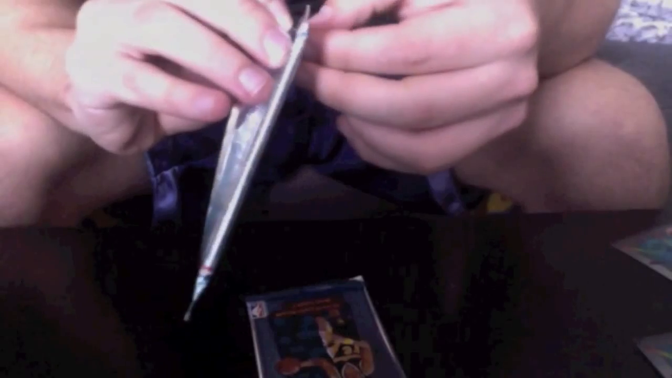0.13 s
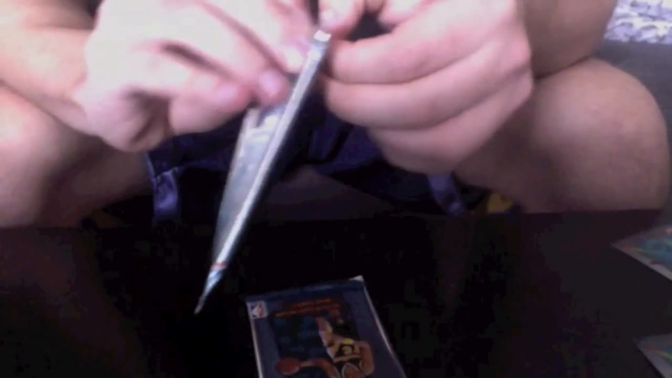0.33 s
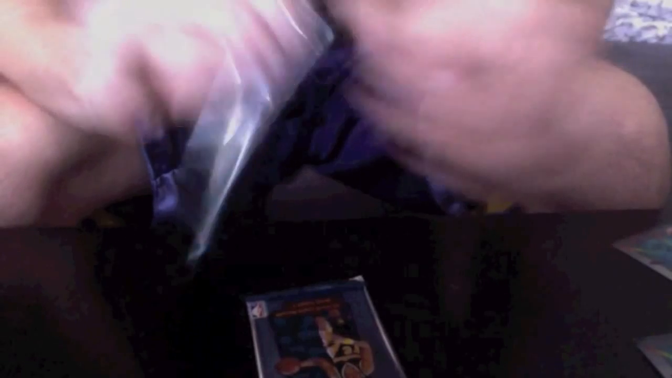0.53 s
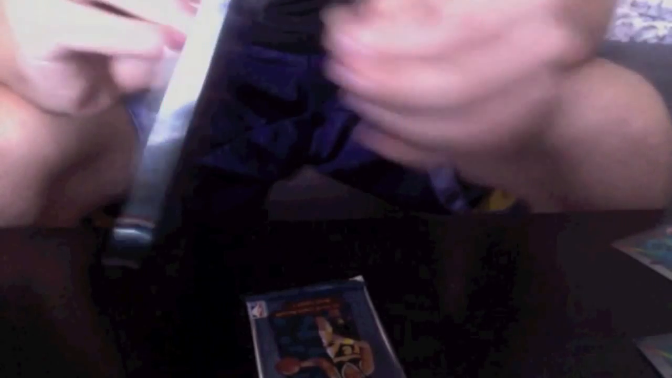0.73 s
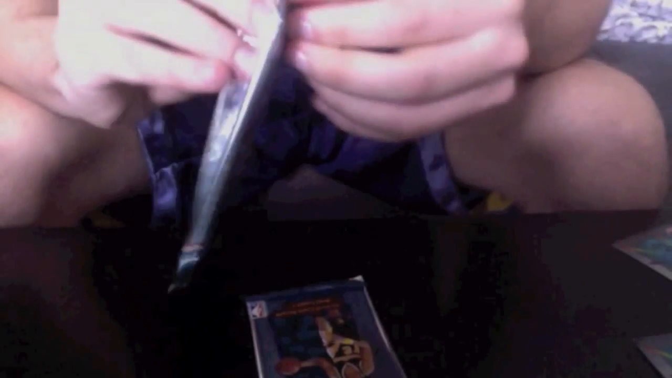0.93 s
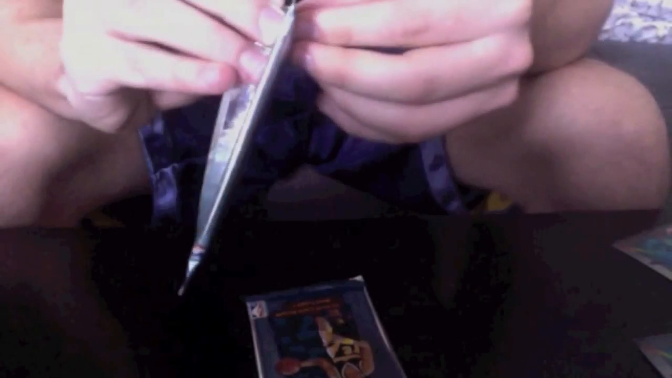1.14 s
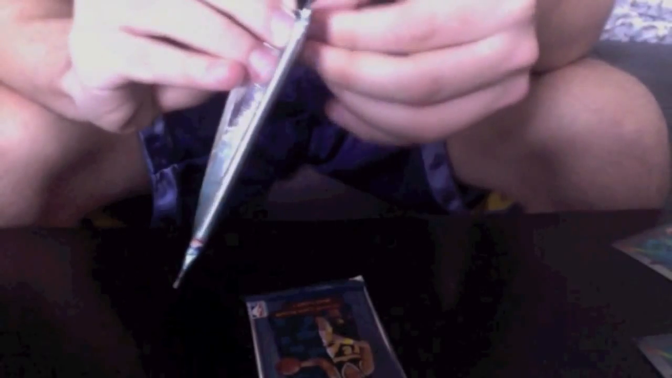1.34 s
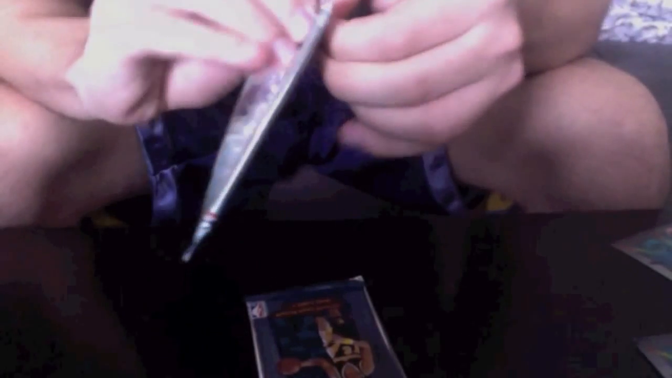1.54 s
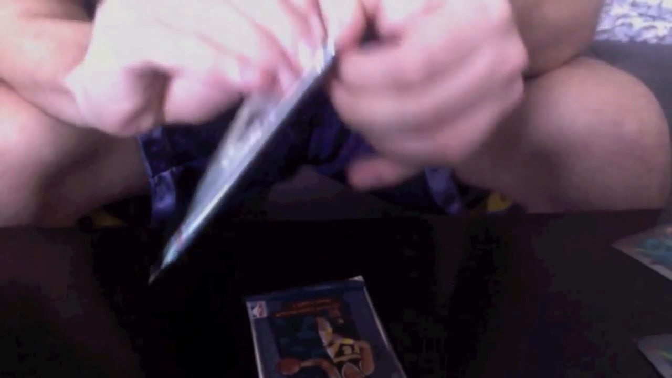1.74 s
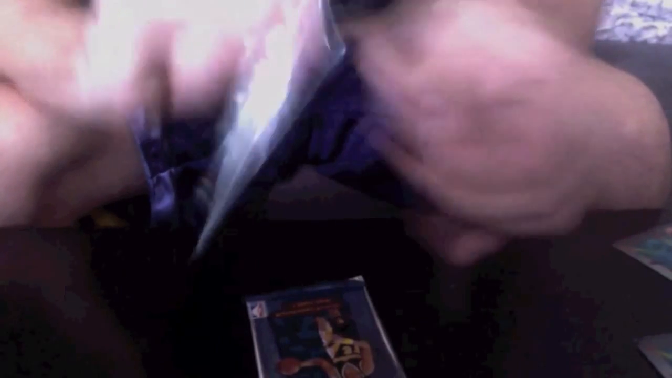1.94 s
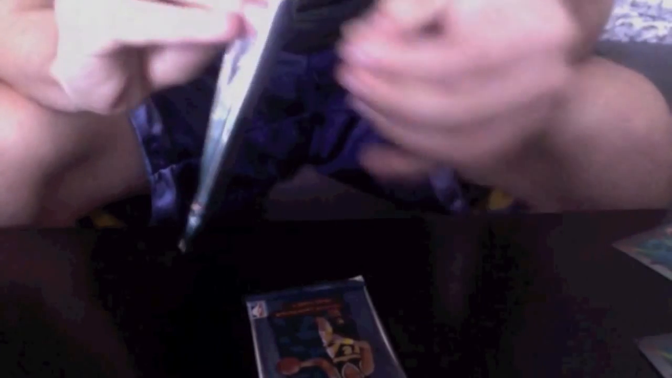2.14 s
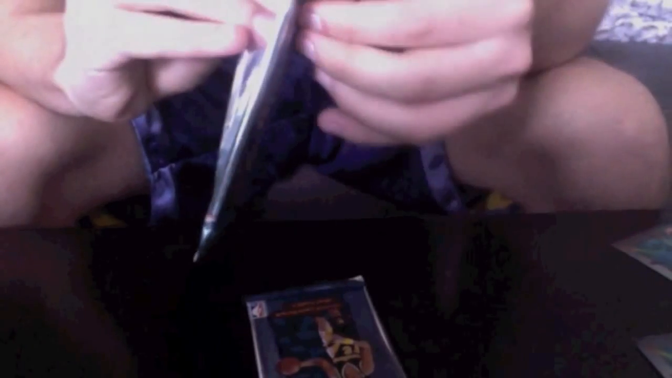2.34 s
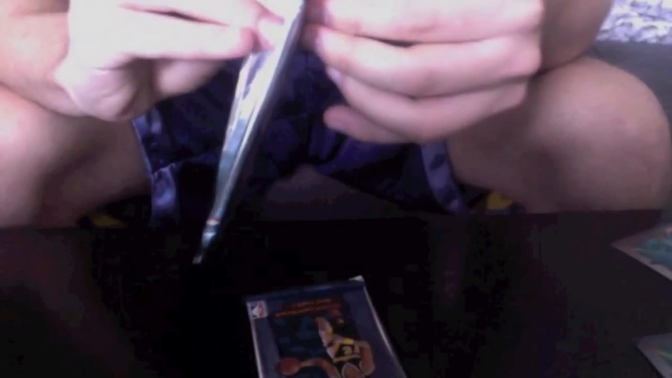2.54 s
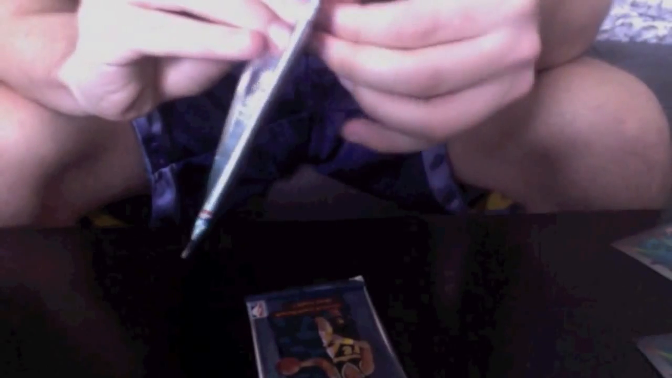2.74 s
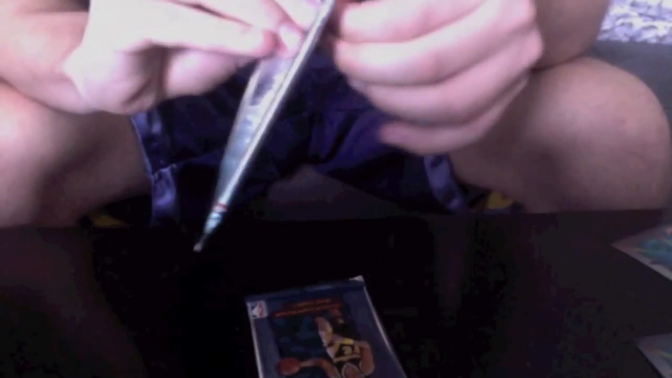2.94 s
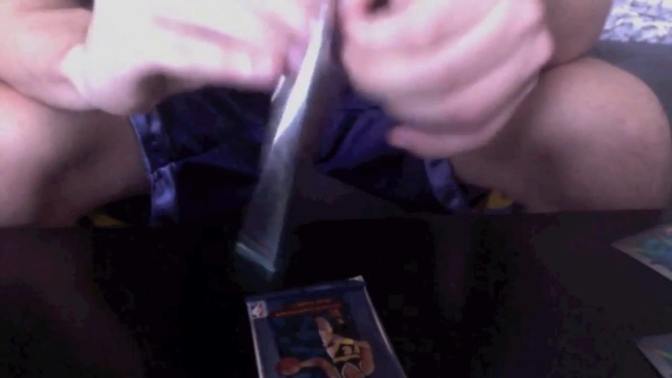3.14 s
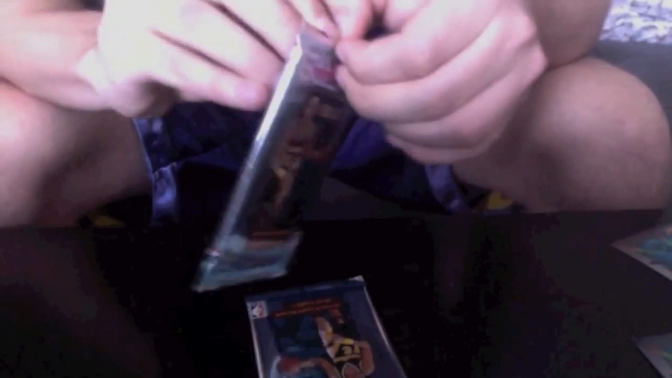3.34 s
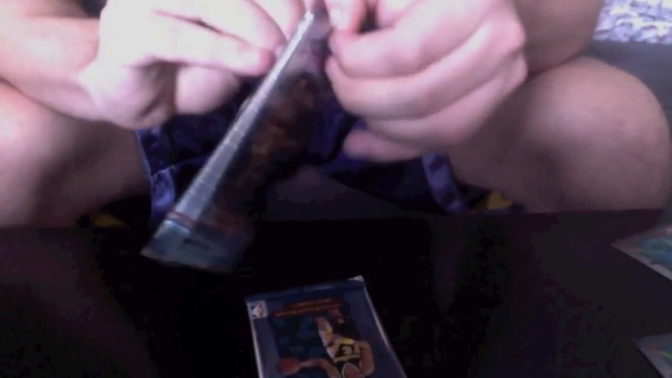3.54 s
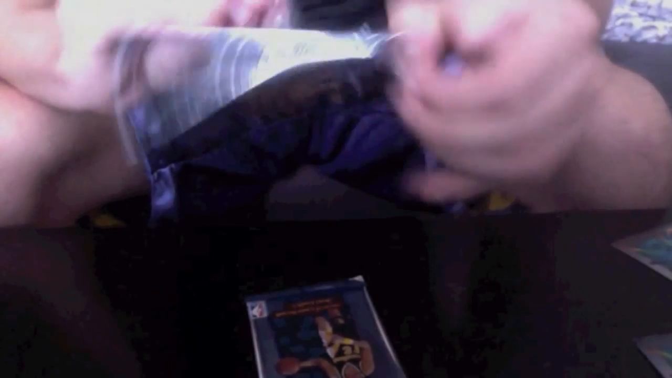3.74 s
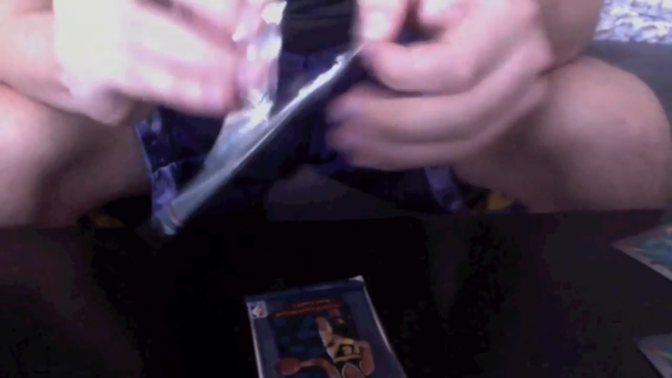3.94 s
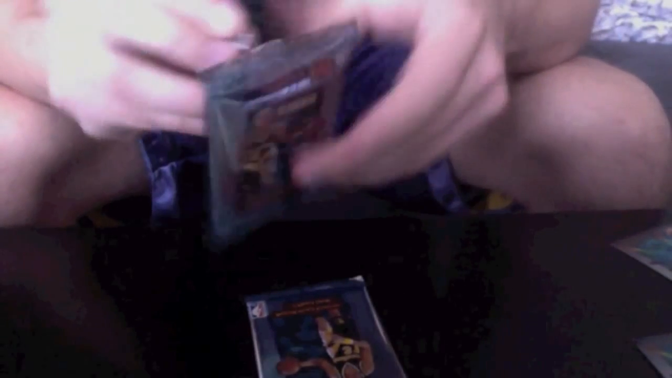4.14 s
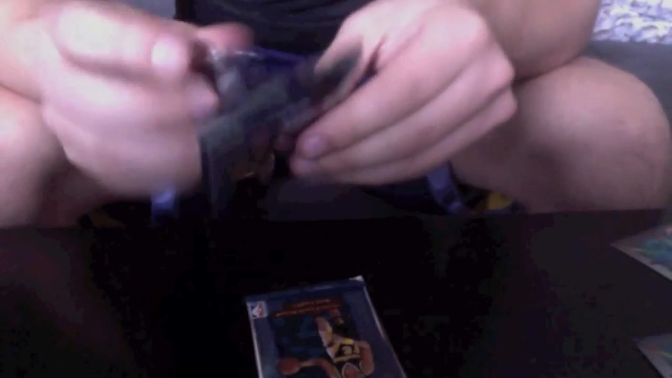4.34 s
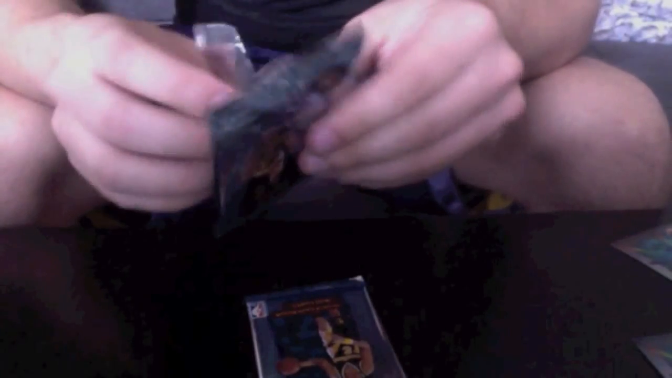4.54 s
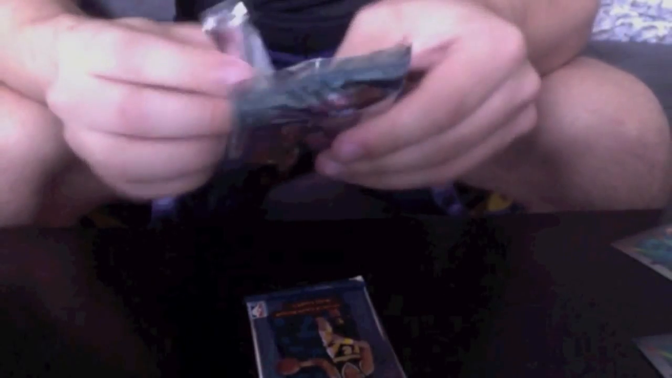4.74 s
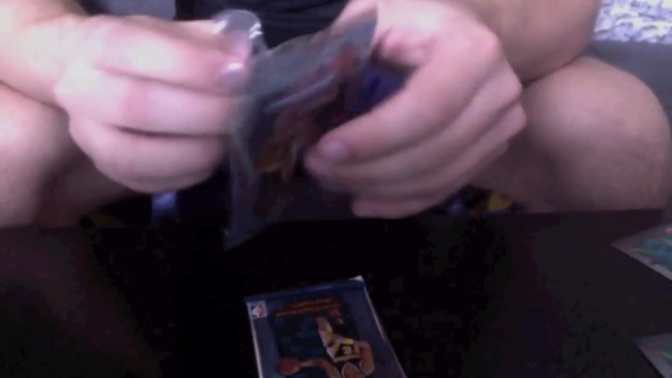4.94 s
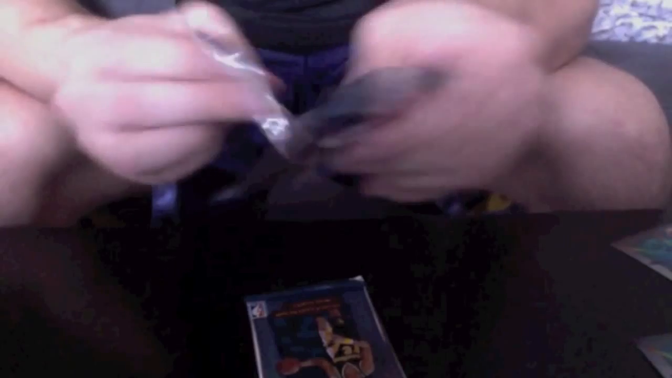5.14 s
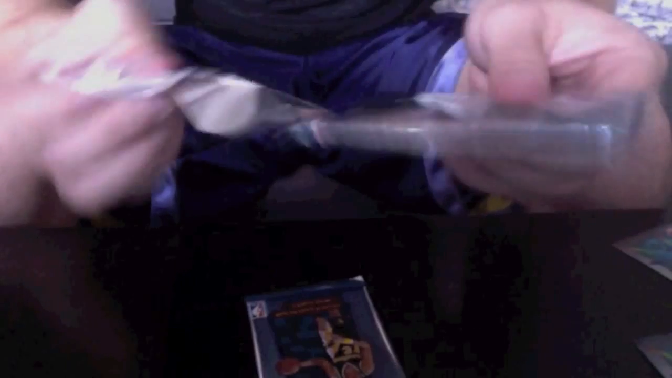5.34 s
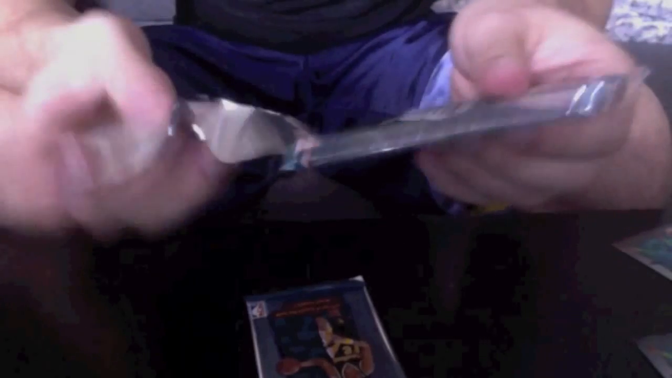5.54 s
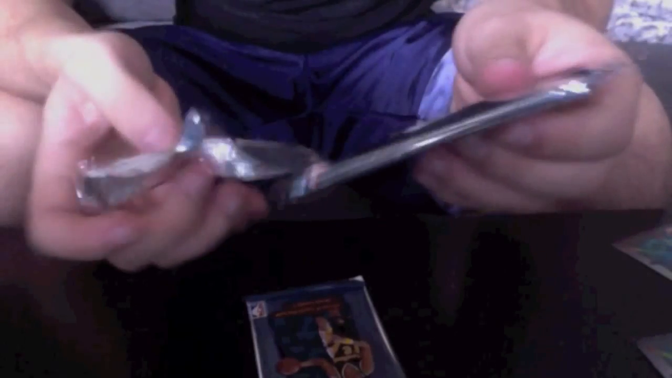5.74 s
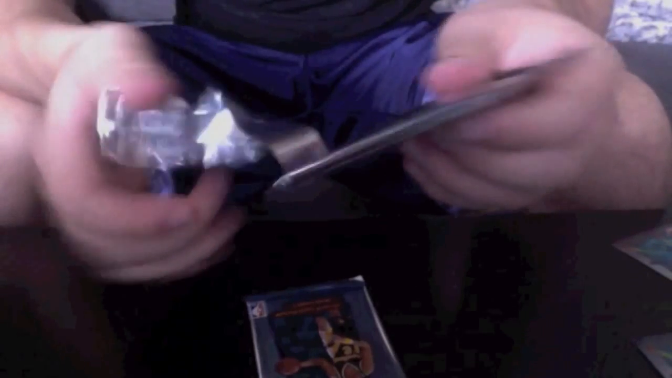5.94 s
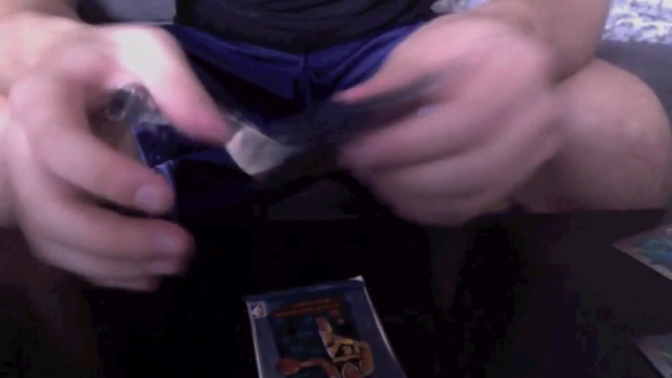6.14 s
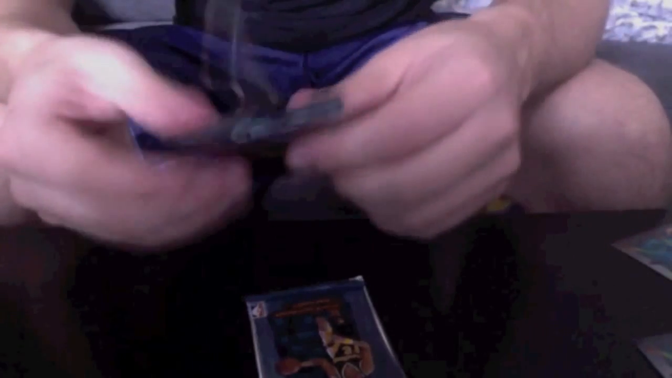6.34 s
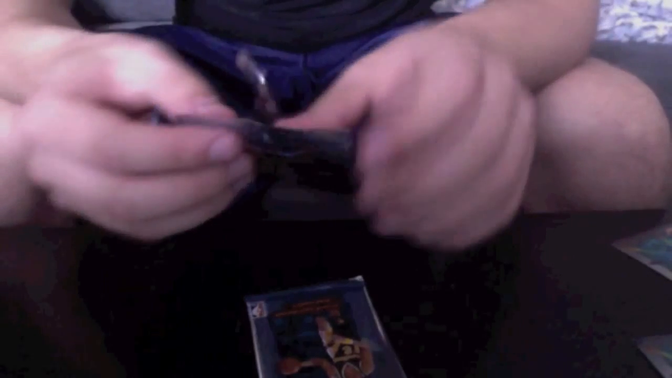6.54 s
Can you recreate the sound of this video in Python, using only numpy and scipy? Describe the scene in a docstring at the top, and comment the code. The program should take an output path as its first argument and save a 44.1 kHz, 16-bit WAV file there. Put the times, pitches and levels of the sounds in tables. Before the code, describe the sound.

Close, bright crackling of a stiff foil pack being picked at, ripped open in one harsh burst, then crumpled and pulled apart in a quiet room.

```python
"""Foil pack picked at, torn and crumpled by hand close to a microphone in a quiet room.
Each buckling crease is a burst of noise ringing its panel for a few cycles; tears pack them densely.
A glued seam creaks in even slips; cards in the pack knock as short decaying low sines.
The table top answers at once, the room a little later; under it lie a hush and a soft fan hum.
The loudest tears are softly clipped."""
import sys
import numpy as np
from scipy import signal
from scipy.fft import rfft, irfft, next_fast_len
from scipy.io import wavfile
from scipy.ndimage import map_coordinates

SR = 44100
rng = np.random.default_rng(int(sys.argv[2]) if len(sys.argv) > 2 else 0)


def to_wav(s):
    """Save 16-bit WAV."""
    ch = np.atleast_2d(s).T  # columns
    pcm = np.round(np.clip(ch, -1, 1) * 32767)  # PCM
    wavfile.write(sys.argv[1], SR, pcm.astype(np.int16))


N = 295470

# single creases buckling: (t/s, panel peak level/dB, panel pitch f/Hz,
#   thud level re panel/dB, sheen level re panel/dB)
CREASES = [(0.0886, -13, 6500, -57.5, -12), (.1987, -18, 4510, -40.5, -17.5),
           (0.204, -14, 4580, -29, -25.5), (0.2211, -2, 4900, -44.5, -8), (.2757, -24.5, 6310, -34.5, -7),
           (.293, -19.5, 4290, -13.5, -29), (0.305, -21, 3260, -29, -21), (.4107, -38, 3780, -19.5, -18),
           (0.4427, -14, 4750, -24.5, -21), (0.4565, -8, 6100, -27.5, -11), (0.4594, -1.5, 6350, -16, -22),
           (.464, 5.5, 5390, -14, -10.5), (0.4764, -13.5, 3640, -3.5, -14.5),
           (0.4843, -10, 7240, -11.5, -13), (.5568, -13, 5370, -26.5, -10), (.5785, -29, 7020, -25, -14),
           (0.5887, -1, 6200, -23, -19.5), (0.6205, 0, 4790, -40, -18.5), (0.6279, -27, 4870, 4.5, -22),
           (0.811, -8, 5100, -21.5, -17.5), (.826, -34, 4000, -22, -20), (0.8625, -17, 4290, -22, -41),
           (.911, -3, 4720, -31.5, -17), (0.952, -25.5, 4540, -26.5, -27), (0.9715, -13.5, 3750, -49, -25),
           (1.014, -12.5, 3740, -18, -25), (1.331, -15, 4900, -38, -47), (1.339, -23.5, 1984, -27, -10),
           (1.3672, -35, 3980, -18, -17), (1.406, -30, 4370, -32.5, -40.5), (1.4531, -18, 4760, -39.5, -11),
           (1.4728, -4, 4900, -24, -12.5), (1.519, -33, 5300, -26.5, -19.5),
           (1.5323, 1.5, 5280, -46, -34.5), (1.5394, -4.5, 6000, -32, -13),
           (1.5495, -19, 5230, -38.5, -17.5), (1.5924, -3.5, 4830, -50, -17),
           (1.5961, -5.5, 5400, -19, -24), (1.6625, -18.5, 4770, -32, -24),
           (1.836, -11.5, 4630, -22.5, -16), (1.8578, 1, 5170, -14, -20.5), (1.873, -1, 6830, -20.5, -19),
           (1.8764, -5.5, 4100, -18.5, -1.5), (1.9593, -14.5, 2070, -17, -30),
           (1.9726, -5, 5700, -18.5, -25), (2.2598, -28.5, 4400, -24, -42.5), (2.2746, -9, 4080, -23, -20),
           (2.417, -33, 3400, -12, -30), (2.5355, -15, 4480, -23, -11.5), (2.5933, -21, 4750, -43, -21),
           (2.633, -24.5, 4700, -26, -14.5), (2.7156, -34, 5800, -12.5, -11.5),
           (2.7834, -27.5, 5300, -22, -22), (2.802, -33, 5450, -21, -6), (2.824, -6.5, 6560, -32, -9),
           (2.8832, -8, 3170, -19.5, -23), (2.9102, -19, 4820, -32, -31), (2.9183, -13.5, 4700, -37, -27),
           (2.9336, -15.5, 4770, -44, -8.5), (3.037, -10, 5530, -20, -11), (3.0526, -3.5, 5400, -32, -9.5),
           (3.0693, -3.5, 4470, -57, -8.5), (3.126, -8.5, 5430, -38.5, -8.5),
           (3.133, -11.5, 4390, -28, -30), (3.1452, -5, 5260, -32.5, -3), (3.154, -24, 2240, -5, -20.5),
           (3.1774, -25.5, 4870, -20.5, -27), (3.2167, -19, 6800, -39.5, -6),
           (3.253, -26.5, 3700, -25.5, -33.5), (3.2748, -1.5, 6500, -14.5, -8),
           (3.3084, -33.5, 5770, -6.5, -28.5), (3.3465, -32, 5730, -19.5, -15),
           (3.3658, 2, 5800, -22.5, -17), (3.4054, -26, 2550, -19, -9.5), (3.4333, -20.5, 1940, -6, -38),
           (3.4786, -25, 3380, -14, -36), (3.4942, -12.5, 4170, -12.5, -25), (3.5105, -30, 5200, -22, -24),
           (3.5362, -25, 4540, -21.5, -32), (3.5605, -32, 4390, -21, -36), (3.5662, 4, 5400, -25, -10),
           (3.6727, -0.5, 4410, -29, -25), (3.6899, 2, 3590, -37.5, -23), (3.6942, 2, 3680, -24, -15),
           (3.701, -5.5, 4550, -6, -23), (3.7098, -9, 2000, -15, -24), (3.7178, -8, 1850, -12, -16),
           (3.727, -7, 3070, -28, -11.5), (3.7431, -7.5, 5550, -19, -26), (3.751, -1.5, 4870, -34.5, -21.5),
           (3.7695, -16, 3930, -4, -26), (3.779, -16, 5200, -5, -18), (3.786, -19.5, 3320, -26, -13),
           (3.806, -12, 3810, -23, -21), (3.813, -14, 3570, -28, -28.5), (3.8291, 3, 4730, -16.5, -17),
           (3.831, -2, 3230, -11.5, -29.5), (3.864, -13.5, 4150, -13, -32), (3.882, -20.5, 4240, -8, -27),
           (3.9558, -11, 6100, -55, -31), (3.9727, -29, 6070, -29.5, -30), (4.025, -9.5, 4980, -16.5, -26),
           (4.1352, -37.5, 2070, -5, -23.5), (4.1967, -26, 4400, -9, -34), (4.25, -19.5, 3900, -16, -13),
           (4.27, -16.5, 3880, -27, -17), (4.289, -23, 3570, -15, -31), (4.3122, -1, 4860, -27.5, -19),
           (4.3277, -5, 4670, -12.5, -28), (4.3348, -6, 5700, -15, -26), (4.3383, -5, 4880, -12, -12),
           (4.3579, -19.5, 4730, -5, -20), (4.4064, -27, 4570, -16, 2), (4.423, -22, 4700, -17, -14),
           (4.4455, -15.5, 4440, -11, -37), (4.5042, -7.5, 4770, -32, -18), (4.5268, -18, 4500, -23, -28),
           (4.5526, -7, 4500, -26, -21), (4.563, -9.5, 5950, -18, -19), (4.5906, -5.5, 5250, -22, -16.5),
           (4.6163, -4.5, 4600, -23, -17), (4.657, -17, 4700, -24, -8), (4.68, -28, 4800, -22, -21),
           (4.6864, -9.5, 4600, -11.5, -15), (4.7063, -16, 4330, -36, -15), (4.719, -4, 5200, -43, -9.5),
           (4.7264, -10.5, 4350, -34, -27), (4.732, -19, 4600, -11, -22), (4.7388, -17, 4630, -13, -23),
           (4.7699, -20.5, 7000, -27, -7), (4.811, -20, 6800, -10, -17), (4.8198, -20, 3620, -24, -28),
           (4.8344, -9, 6030, -13, -22), (4.846, -13, 5150, -31, -18), (4.8554, -9.5, 4400, -22, -15),
           (4.8594, -8, 4610, -17, -18), (4.8747, 1.5, 5310, -31.5, -14.5), (4.88, -8.5, 6200, -11, -7),
           (4.8916, -1, 4120, -22, -18), (4.9097, -18, 3730, -26, -12), (4.9436, -28, 5320, -18, -31),
           (4.9494, -20.5, 4570, -15, -37), (4.972, -4, 3770, -30, -40), (4.9841, -5, 5200, -34.5, -22),
           (4.994, -3, 5200, -36.5, -15), (5.0098, -9.5, 4160, -38, -12), (5.023, -12, 4540, -13, -15),
           (5.0544, -2, 4500, -24.5, -17.5), (5.059, -0.5, 4360, -33, -25), (5.0648, 2, 4530, -25, -22),
           (5.0773, 3, 4780, -18, -17.5), (5.0909, 1.5, 4530, -20.5, -21), (5.1004, 2.5, 4480, -25, -19.5),
           (5.109, -2.5, 4500, -18, -19), (5.1174, -3, 4520, -8.5, -14.5), (5.125, -1.5, 4220, -28.5, -16),
           (5.1281, 3.5, 5160, -29.5, -22), (5.1331, 9, 4440, -2, -19), (5.143, 1, 4520, -8.5, -15),
           (5.1437, -1, 3530, -23.5, -25), (5.153, 0.5, 4580, -18.5, -26.5), (5.1592, -4, 5130, -18.5, -6),
           (5.165, 2, 3040, -12.5, -20), (5.176, -2.5, 3240, -6, -15), (5.1906, -4, 3270, -4, -20.5),
           (5.1969, -3, 3300, -17, -21), (5.2025, 0.5, 4570, -13.5, -19.5), (5.21, -5.5, 4950, -5, -10.5),
           (5.2161, 5, 4500, -28, -13), (5.2242, -2.5, 4950, -24, -18), (5.229, 0.5, 3400, -16.5, -19),
           (5.242, -8, 4540, -19, -5), (5.2726, -13, 4960, -30, -13), (5.282, -18, 3670, -24, -23),
           (5.3095, -18, 6250, -29, -8), (5.3422, -2, 4530, -42, -22), (5.3655, -17.5, 6580, -39, -37),
           (5.4141, -4, 6620, -62, -32), (5.448, -39, 4230, -18, -19), (5.464, -15.5, 4400, -17, -45),
           (5.469, 1, 4950, -27, -15.5), (5.485, -20.5, 4300, -27, -12), (5.531, -12.5, 5460, -10, -21),
           (5.6366, -13, 3240, -11, -12), (5.7258, -23.5, 3700, -26, -32), (5.7563, -14, 3900, -25, -22),
           (5.7632, -5.5, 6200, -27, -16), (5.8245, -13.5, 3400, -12, -21), (5.8932, -31, 6100, -19, -21),
           (5.9173, -14.5, 3940, -31, -18), (5.99, -39, 2500, -15, -15), (6.008, -34.5, 3600, -15, -22),
           (6.0542, -12, 7700, -49, -2), (6.0679, -16.5, 5100, -14.5, -9), (6.079, -33, 7260, -21, -2),
           (6.1828, -20, 6965, -36, -9), (6.2179, -29, 3360, -21, -13), (6.2298, -20.5, 2300, -12, -23),
           (6.2345, -17, 4460, -40, 0), (6.244, -12.5, 7800, -27, -28), (6.29, -23, 5050, -26, -17),
           (6.2932, -21, 2550, -24, -27), (6.3262, -12, 4600, -30, -5.5), (6.4807, -31, 4900, -28, -34),
           (6.5419, -12.5, 1920, -17.5, -23), (6.633, -14, 4930, -18, -17.5),
           (6.6399, -25.5, 2500, -16.5, -18)]
# rub and tear strokes: (start t/s, end t/s, level/dB, fade after end/(dB/s),
#   sheen level re panel/dB, mid-sized crease level re stroke/dB)
STROKES = [(0.194, 0.31, -55.5, 899.5, -10.5, -0.5), (.46, 0.488, -21, 897, -10, -0.5),
           (.49, 0.527, -28, 127, -12.5, 0), (0.926, 1.004, -49, 400, -17, 11.5),
           (1.03, 1.073, -55.5, 897.5, -24, 9.5), (1.42, 1.483, -59, 899.5, -7, 11),
           (1.855, 1.897, -23.5, 897, -12, 5), (1.9, 1.924, -38, 129, -11, 5),
           (2.888, 2.953, -49.5, 900, -7, 15), (3.04, 3.084, -41.5, 900, -4, 6),
           (3.114, 3.154, -38.5, 900, -9, 11), (3.5665, 3.573, -4.5, 4000.5, -7.5, 0),
           (3.579, 3.584, -13, 900, -13, 6), (3.586, 3.611, 0, 2999, -15, -2),
           (3.612, 3.625, -5, 900, -11, 4), (3.629, 3.648, 0, 2000, -14, 2),
           (3.65, 3.651, -4, 3000, -16, 0), (3.659, 3.716, -27.5, 145, -11, 9),
           (3.84, 3.88, -44, 900, -11.5, 19), (3.946, 3.972, -39, 2000.5, -19, 17.5),
           (4.006, 4.024, -37, 2000, -20, -3), (4.17, 4.218, -48, 900, -27, 16.5),
           (4.255, 4.435, -41.5, 900, -14, -7.5), (4.469, 4.495, -28.5, 300, -9, 6.5),
           (4.5, 4.576, -33.5, 202, -7.5, 12.5), (4.68, 4.737, -34.5, 2000, -13, 7.5),
           (4.816, 4.892, -36, 400, -9, 8.5), (4.94, 5.023, -35.5, 2000, -15, 11),
           (5.047, 5.079, -14, 2001.5, -15, 9), (5.086, 5.112, -15.5, 901.5, -12.5, 9.5),
           (5.134, 5.149, -8.5, 900, -21, 4.5), (5.15, 5.21, -18, 900, -10, 10.5),
           (5.212, 5.237, -12, 2500, -9, 2.5), (5.237, 5.255, -31, 191, -8, -2),
           (5.741, 5.759, -38, 900, -20, 5), (5.818, 5.822, -25.5, 1500, -16, 2),
           (5.909, 5.92, -36.5, 1491, -20, 8), (6.14, 6.185, -45.5, 900, -15, -2),
           (6.18, 6.204, -38.5, 1500, -4, -2), (6.212, 6.24, -42.5, 300, -8.5, 17),
           (6.335, 6.38, -50, 900, 0, 1), (6.503, 6.527, -45, 400, -22, 6), (6.55, 6.6, -44.5, 400, -16, 8),
           (6.62, 6.662, -46.5, 900, -18, 6)]
# glued seam letting go: (start t/s, end t/s, slip rate/(1/s), level/dB, pitch f/Hz, sheen level re panel/dB)
SEAM_SLIPS = [(0.3317, 0.368, 112, -35, 5550, 5.5), (2.948, 2.9816, 365, -24.5, 7200, -10.5),
              (2.99, 3.005, 720, -26.5, 5200, -7), (3.011, 3.0175, 1800, -27.5, 5500, -14),
              (3.912, 3.934, 600, -22.5, 6100, -6), (4.008, 4.028, 1140, -28, 6600, -13),
              (4.98, 5.003, 830, -14.5, 5430, -10), (5.0026, 5.019, 660, -9, 7000, -17.5),
              (5.025, 5.038, 1100, -16, 6550, -5)]
# cards in the pack jolting: (t/s, level before onset and decay/dB, pitch f/Hz)
CARD_JOLTS = [(0.46, -24.5, 383), (.465, -10.5, 870), (6.066, -24, 930), (3.597, -13, 237),
              (3.6371, -14, 224), (3.83, -16.5, 386), (4.337, -24, 287), (4.339, -11.5, 804),
              (4.495, -41, 900), (4.565, -23.5, 800), (4.709, -23, 850), (4.719, -17.5, 880),
              (4.729, -24.5, 835), (5.092, -20.5, 273), (5.16, -10.5, 376), (5.529, -14.5, 944),
              (5.533, -22, 250)]
# body of the foil sheet: (f/Hz, relative level/dB)
FOIL_SPECTRUM = [(880, -47.5), (1500, -16), (1850, -4), (2830, -5.5), (4560, -2), (5120, -3.5),
                 (7140, -4.5), (7950, -14), (9500, -35), (12400, -54), (20900, -120)]
# the pack flexing: (f/Hz, relative level/dB)
THUD_SPECTRUM = [(60, -39), (150, -6), (300, -7), (600, 0.5), (1000, 4), (1500, 4), (2000, 1.5),
                 (2600, -22.5), (4000, -50)]
# sharp edge of a snap: (f/Hz, relative level/dB)
SHEEN_SPECTRUM = [(5000, -19), (8500, -2.5), (14500, -13.5), (15700, -26), (16400, -27.5)]
# near reflections: (delay t/ms, level re direct/dB)
TABLE_ECHOES = [(1.3, -20.5), (2.1, -19.5), (2.9, -17.5), (3.7, -21.5), (4.4, -23.5), (5.8, -28),
                (7.5, -31)]
# room decay: (f/Hz, t60/s)
ROOM_T60 = [(300, 0.39), (2000, 0.43), (5000, 0.24), (10000, 0.29), (16000, 0.3)]
# room hush: (f/Hz, relative level/dB)
HUSH_SPECTRUM = [(25, -20.5), (60, -8), (108, -7.5), (185, -11), (350, -10.5), (800, -9.5), (1100, -15.5),
                 (2840, -21.5), (6000, -30.5), (9000, -41.5), (16000, -61.5)]
# wavering fan hum: (f/Hz, half-width at half amplitude/Hz, rms level/dB)
FAN_LINES = [(200, 39, -63.5), (421.7, 4.5, -63)]
# room onset colour: (f/Hz, level/dB)
ROOM_COLOUR = [(500, 4.5), (4000, -1.5), (9000, 0.5), (16000, 1.5)]

# time to the burst's peak for a -10 dB crease at 4500 Hz with -19 dB thud; dB of thud or level that double it
SNAP_MS, THUD_DOUBLES_DB, LEVEL_DOUBLES_DB = 0.62, 29.5, 23
LOW_PANEL_POWER = 0.89  # growth of that time on low panels
GRIP_S, BUNCH_DB = 0.002, 2  # rise of a stroke, depth of its bunches
CRACKLE_SCATTER_DB, CRACKLE_THUD_DB = 2, -14
DULL_DB_PER_DB = 0.4  # sheen lost per dB of fade
POP_SCATTER_DB, POP_THUD_DB, POP_SHEEN_DB = 4, -20.5, -10  # sheen re the stroke's sheen
HUSH_RMS_DB, ROOM_DB = -55, -17.5
TOP_HZ = 16500


def amp(db):
    """Gain of a level in dB."""
    return 10 ** (np.asarray(db) / 20)


def unit(x):
    """x at rms 1."""
    return x / np.sqrt(np.mean(x ** 2) + 1e-20)


def along(points, hz):
    """(Hz, value) points interpolated on a log frequency axis."""
    f, v = np.transpose(points)
    return np.interp(np.log(hz + 1), np.log(f + 1), v)


def filtered(x, response):
    """x times a response of frequency."""
    size = next_fast_len(N + 8192)
    f = np.fft.rfftfreq(size, 1 / SR)
    return irfft(rfft(x, size) * response(f), size)[..., :N]


def causal(spectrum, size):
    """Minimum-phase response with the given spectrum, on the grid of a size-point transform."""
    gain = amp(along(spectrum, np.fft.rfftfreq(size, 1 / SR)))
    cepstrum = irfft(np.log(np.maximum(gain, 1e-3)))
    cepstrum[1:size // 2] *= 2
    cepstrum[size // 2 + 1:] = 0
    return np.exp(rfft(cepstrum))


def placed(start_s, rows):
    """Sums each row into a track from its start time on."""
    at = np.round(start_s * SR).astype(int)[:, None] + np.arange(rows.shape[1])
    return np.bincount(at.ravel(), rows.ravel(), N + SR)[:N]


def buckle(noise, start_s, db, hz, thud_db, sheen_db, ms, ring, cycles, size):
    """Short noise bursts that ring their panel, push the pack and scratch the treble."""
    t = np.arange(noise.shape[2]) / SR
    peak_s = np.clip(ms, 0.04, 2.5)[:, None] / 1000
    envelope = (t / peak_s * np.exp(1 - t / peak_s)) ** 2
    burst = rfft(noise * envelope[:, None], size)
    f, f0 = np.fft.rfftfreq(size, 1 / SR), hz[:, None]
    damping = 1j * f * f0 / cycles  # cycles = resonance Q
    panel = 1 + ring * damping / (f0 * f0 - f * f + damping)
    layers = [(db, panel * causal(FOIL_SPECTRUM, size)),
              (db + thud_db, causal(THUD_SPECTRUM, size)),
              (db + sheen_db, causal(SHEEN_SPECTRUM, size))]
    rows = 0
    for k, (level_db, colour) in enumerate(layers):
        part = irfft(burst[:, k] * colour)
        rows = rows + amp(level_db)[:, None] * part / np.abs(part).max(1, keepdims=True)
    return placed(start_s, rows)


def snap_ms(db, hz, thud_db):
    """Strong creases, those that push the pack harder and those on low wide panels give way more slowly."""
    doublings = (thud_db + 19) / THUD_DOUBLES_DB + (db + 10) / LEVEL_DOUBLES_DB
    return SNAP_MS * 2 ** doublings * (4500 / hz) ** LOW_PANEL_POWER


def snaps(size=512):
    """The single creases that stand out, each a burst ringing its own panel."""
    start_s, db, hz, thud_db, sheen_db = np.transpose(CREASES)
    noise = rng.standard_normal((len(start_s), 3, size))
    ms = snap_ms(db, hz, thud_db)
    return buckle(noise, start_s, db, hz, thud_db, sheen_db, ms, ring=4.75, cycles=3.4, size=1024)


def stroke(s):
    """Level, sheen and mid-sized crease level of the strongest stroke: grip, hold, fade that dulls."""
    start, end, db, fade, sheen_db, pop_db = np.transpose(STROKES)[:, :, None]
    grip_db = 20 * np.log10(np.clip((s - start) / GRIP_S, 1e-9, 1))
    faded_db = np.abs(fade) * np.maximum(s - end, 0)
    level_db = db + grip_db - faded_db
    top = level_db.argmax(axis=0)[None]
    curves = (level_db, sheen_db - DULL_DB_PER_DB * faded_db, level_db + pop_db)
    return [np.take_along_axis(c, top, axis=0)[0] for c in curves]


def crackle(count=14000, size=96):
    """Tiny creases at random moments while foil is rubbed or torn, a few stronger than the rest."""
    draw = rng.random((count, 4))
    noise = rng.standard_normal((count, 3, size))
    # creases give way in bunches: smooth random curve, 480 points over the scene
    bunches = map_coordinates(rng.standard_normal(480), [draw[:, 0] * 479])
    start_s = draw[:, 0] * N / SR
    db, sheen_db, _ = stroke(start_s)
    scatter_db = -CRACKLE_SCATTER_DB * (np.log(1.02 - draw[:, 1]) + 1)
    size_db = db + scatter_db + BUNCH_DB * bunches
    hz = 4700 * 2 ** (1.1 * (draw[:, 2] - 0.5))
    on = size_db > -75
    ms = 0.13 + 0.23 * draw[on, 3]
    return buckle(noise[on], start_s[on], size_db[on], hz[on], CRACKLE_THUD_DB, sheen_db[on], ms,
                  ring=2.6, cycles=6.6, size=512)


def pops(count=1100, size=256):
    """Mid-sized creases scattered through every stroke, each with its own panel and weight."""
    draw = rng.random((count, 2))
    odd = rng.standard_normal((count, 3))
    noise = rng.standard_normal((count, 3, size))
    start_s = draw[:, 0] * N / SR
    hz = np.clip(4500 * 2 ** (0.29 * odd[:, 0]), 1800, 7500)
    _, stroke_sheen_db, db = stroke(start_s)
    size_db = np.minimum(db - POP_SCATTER_DB * (np.log(1.02 - draw[:, 1]) + 1), 3)
    thud_db = POP_THUD_DB + 7 * odd[:, 1]
    sheen_db = stroke_sheen_db + POP_SHEEN_DB + 6 * odd[:, 2]
    ms = snap_ms(size_db, hz, thud_db)
    return buckle(noise, start_s, size_db, hz, thud_db, sheen_db, ms, ring=2.5, cycles=5.3, size=512)


def creaks(count=24, size=64):
    """Slips of one seam share one burst shape and follow each other almost evenly."""
    start, end, rate, db, hz, sheen_db = (c.repeat(count) for c in np.transpose(SEAM_SLIPS))
    noise = rng.standard_normal((len(SEAM_SLIPS), 3, size)).repeat(count, 0)
    jitter = rng.standard_normal((len(start), 2))
    slip = np.arange(len(start)) % count
    slip_s = start + (slip + 0.1 * jitter[:, 0]) / rate
    slip_db = db + 1.8 * jitter[:, 1] - 200 * (slip_s > end)  # silent once the seam holds again
    ms = np.full(len(slip_s), 0.12)
    return buckle(noise, slip_s, slip_db, hz, -38, sheen_db, ms, ring=9.0, cycles=3.0, size=512)


def knocks(size=4096):
    """Each jolt is a low sine with a soft start, losing 10 dB a cycle."""
    start_s, db, hz = np.transpose(CARD_JOLTS)
    turns = hz[:, None] * np.arange(size) / SR
    decay = amp(db[:, None] - 10.0 * turns)
    onset = 1 - np.exp(-turns / 0.32)
    return placed(start_s, decay * onset * np.sin(2 * np.pi * turns))


def table(x):
    """Direct sound plus a few quick copies off the table top and the hands."""
    def response(f):
        return 1 + sum(amp(db) * np.exp(-2j * np.pi * f * ms / 1000) for ms, db in TABLE_ECHOES)
    return filtered(x, response)


def room(x, count=45):
    """Noise tail builds up, then each frequency dies at its own speed; each equal stretch draws a fresh one."""
    out, step = np.zeros(N + 2 * SR), N // count + 1
    for k in range(count):
        hz, t, z = signal.stft(rng.standard_normal(SR // 2), SR, nperseg=256)
        build_up = 1 - np.exp(-t / 0.0084)
        colour = amp(along(ROOM_COLOUR, hz))[:, None]
        decay = amp(-60 * t / along(ROOM_T60, hz)[:, None])
        tail = signal.istft(z * build_up * colour * decay, SR, nperseg=256)[1]
        wet = signal.fftconvolve(x[k * step:][:step], tail / np.linalg.norm(tail))
        out[k * step + 130:][:len(wet)] += wet  # 130 samples: about 3 ms late
    return out[:N]


def hush():
    """Soft broad room noise: white noise shaped by a spectrum."""
    noise = rng.standard_normal(N)
    return amp(HUSH_RMS_DB) * unit(filtered(noise, lambda f: amp(along(HUSH_SPECTRUM, f))))


def fan():
    """Fuzzy hum lines: noise through narrow resonances, so each wavers."""
    def line(hz, width_hz):
        noise = rng.standard_normal(N)
        return unit(filtered(noise, lambda f: 1 / (1 + ((f - hz) / width_hz) ** 2)))
    return sum(amp(db) * line(hz, width_hz) for hz, width_hz, db in FAN_LINES)


def scene():
    """Foil pack, its reflections, hush and fan."""
    foil = snaps() + creaks() + crackle() + pops() + knocks()
    return (table(foil) + amp(ROOM_DB) * room(foil) + hush() + fan())[None]


def record(dry):
    """Input clips softly, loses the deep bass and keeps nothing from TOP_HZ up."""
    clipped = dry / (1 + np.abs(dry / 0.9) ** 8) ** (1 / 8)

    def response(f):
        ratio = f / 110
        bass_cut = 0.04 + 0.87 * ratio ** 4 / np.sqrt(1 + ratio ** 8)
        edge_db = along([(15600, 0), (16000, -14), (TOP_HZ, -26)], f)
        return bass_cut * amp(edge_db) * (f < TOP_HZ)
    return filtered(clipped, response)


dry = scene()
out = record(dry)
to_wav(out)
```